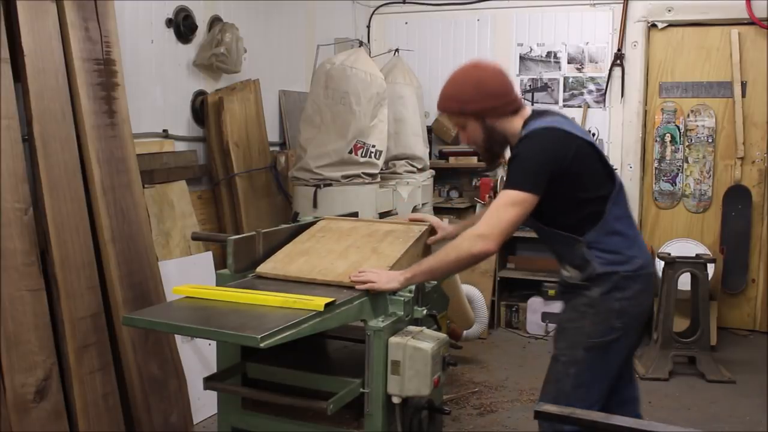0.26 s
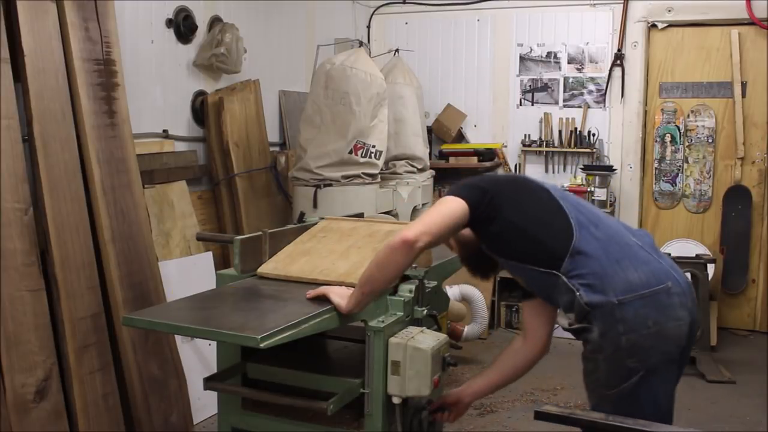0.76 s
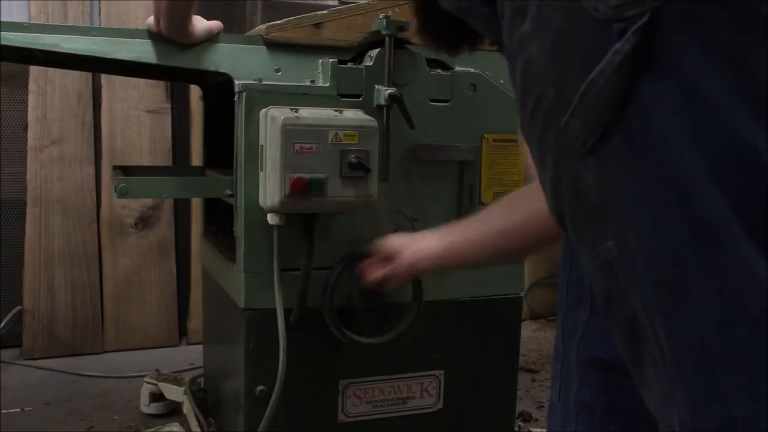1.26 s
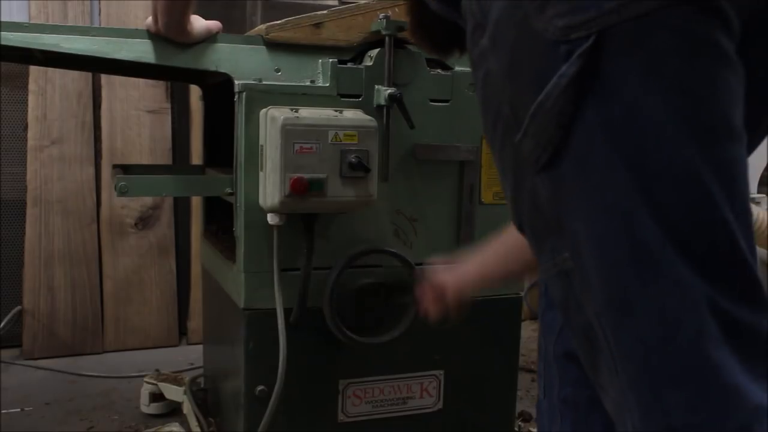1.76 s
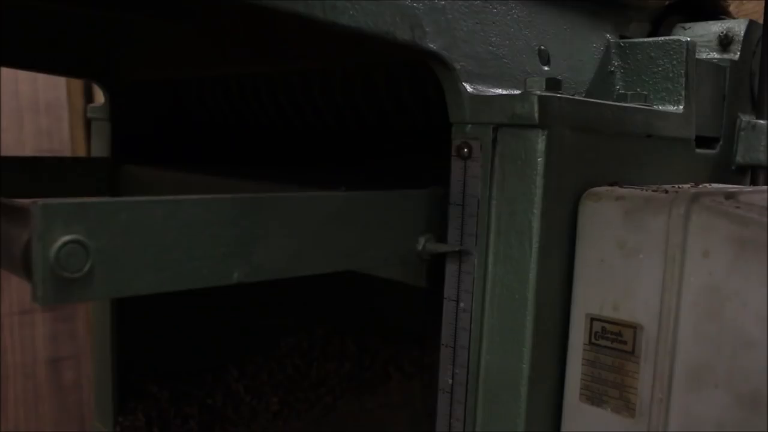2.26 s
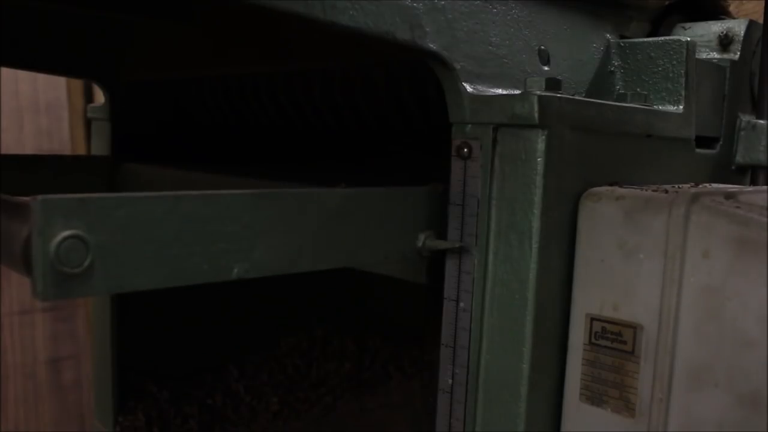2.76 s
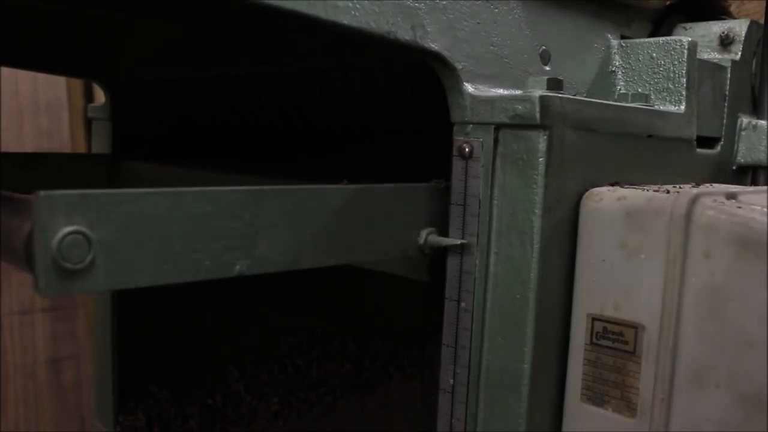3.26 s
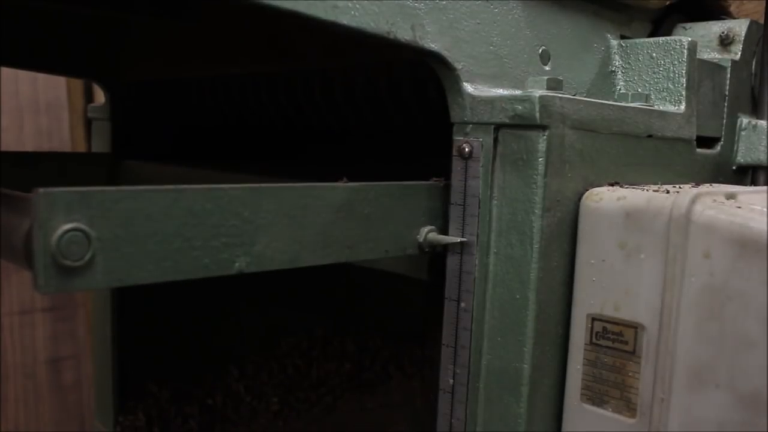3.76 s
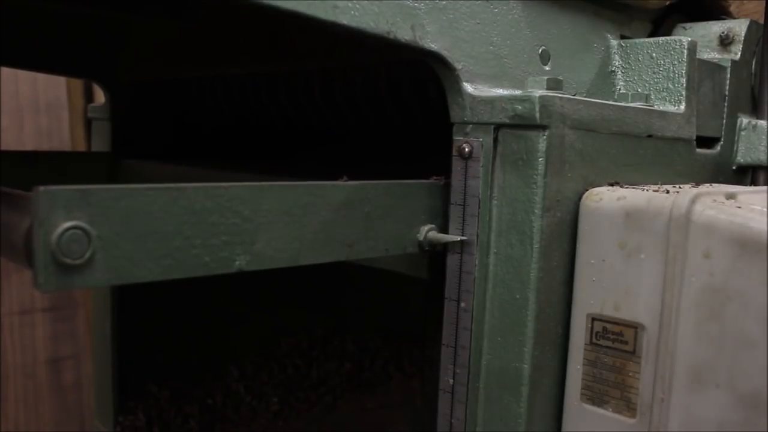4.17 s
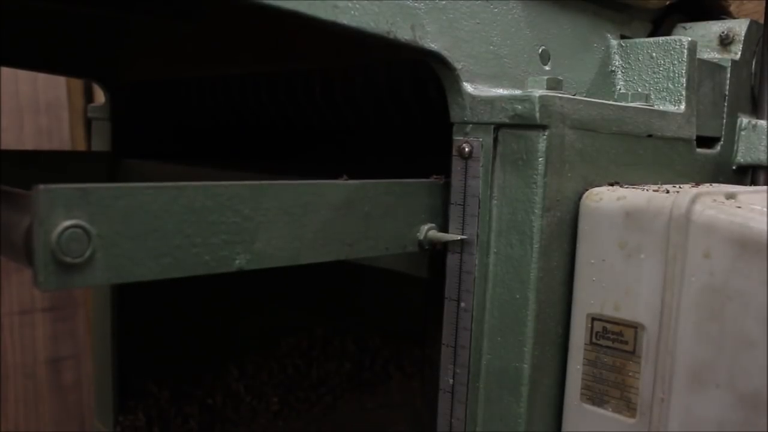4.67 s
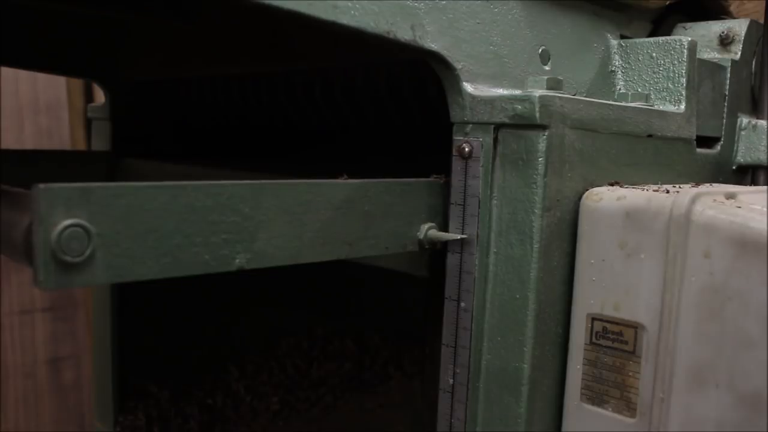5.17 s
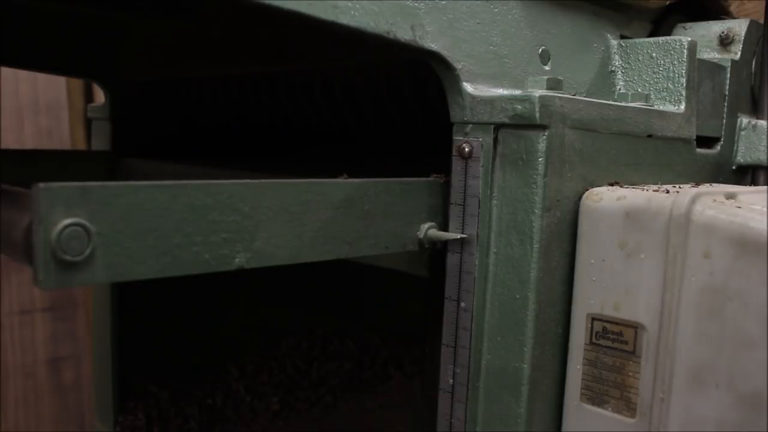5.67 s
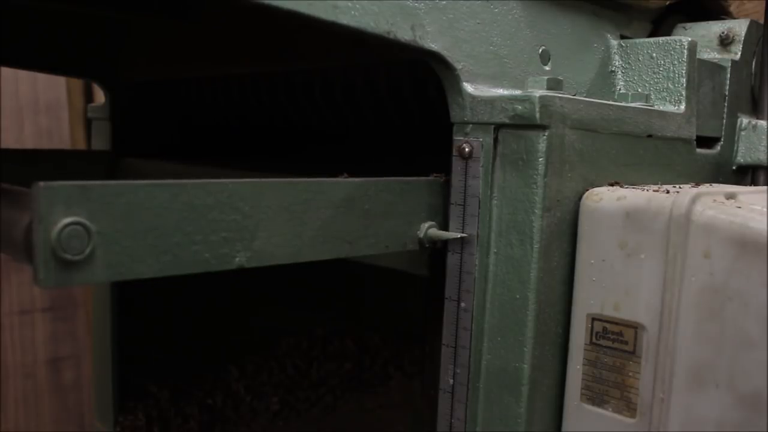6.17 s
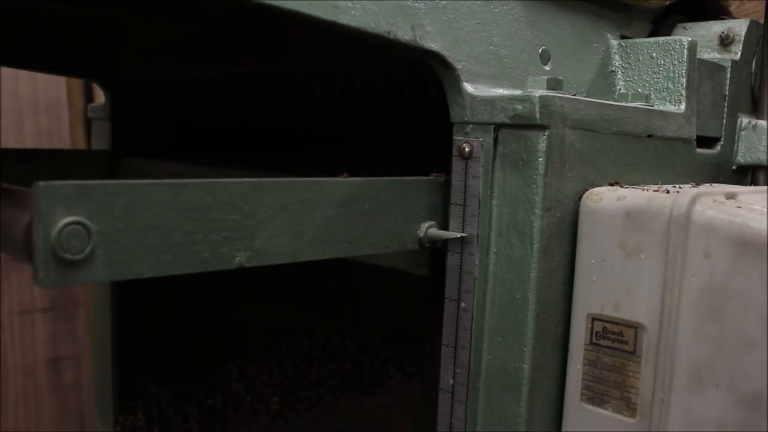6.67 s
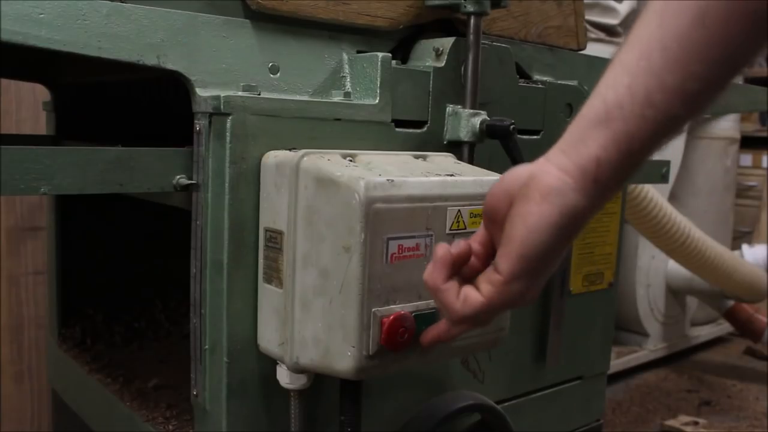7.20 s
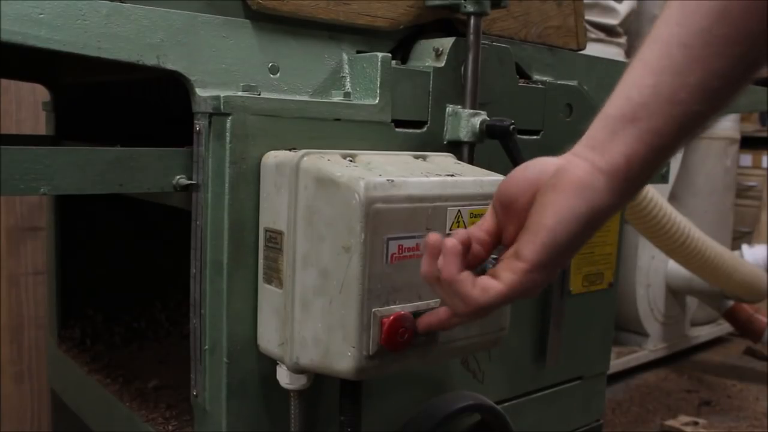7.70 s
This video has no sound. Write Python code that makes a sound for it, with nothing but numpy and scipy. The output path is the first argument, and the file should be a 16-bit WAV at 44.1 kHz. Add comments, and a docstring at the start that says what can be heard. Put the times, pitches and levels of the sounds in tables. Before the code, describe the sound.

Sharp knocks and brief scuffs open the scene in a workshop with a short echo. Then the handwheel of an iron woodworking machine turns, sticking and slipping in thin, piercing squeaks mixed with clanks and creaks. After a quieter stretch of light taps and rubbing, a switch snaps and the motor surges into a growl. Far-off machines drone faintly underneath throughout.

```python
"""A heavy woodworking machine stands idle in an echoing workshop, over the rush of distant machines.
First come knocks of tools and scuffs of hands, cloth and timber. From 1.2 s to 5.3 s a dry handwheel
winds the table: its screw sticks and slips, squealing near 5 kHz, among short creaks and gliding tones.
A few softer knocks and scuffs follow. At 7.5 s the switch clacks and the motor starts with a roar."""
import sys
import numpy as np
from scipy import signal
from scipy.fft import rfft, irfft
from scipy.io import wavfile
from scipy.ndimage import uniform_filter1d

SR = 44100
rng = np.random.default_rng(int(sys.argv[2]) if len(sys.argv) > 2 else 0)


def wav_record(signal):
    """Record a signal, one row per channel, as 16-bit PCM in the file named by sys.argv[1]."""
    frames = np.transpose(np.atleast_2d(signal))
    bounded = np.clip(frames, -1, 1)
    # unit amplitude maps onto the largest positive 16-bit level
    quanta = np.round(bounded * 32767).astype(np.int16)
    wavfile.write(sys.argv[1], SR, quanta)


N = 350154
T = np.arange(N) / SR

# Slips of the screw: peak_s, level_db, rise_s, fall_s, start_pitch_hz, end_pitch_hz
SCREW_SLIPS = [(1.232, -3.5, 0.002, 0.0093, 5370, 5350), (1.272, -23, .008, 0.022, 5200, 5300),
               (1.538, -6, 0.003, 0.026, 5110, 5266), (1.56, -13, 0.018, 0.048, 5243, 5295),
               (2.013, -2.5, 0.0046, 0.01, 6020, 5740), (2.05, -27.5, 0.044, 0.034, 5780, 5720),
               (2.083, -21, 0.017, .02, 5840, 5770), (2.099, -8, .006, 0.011, 5720, 5640),
               (2.107, -12.5, .008, .012, 5590, 5460), (2.129, -18.5, .015, .01, 5540, 5570),
               (2.339, -12, .005, 0.0089, 4930, 5010), (2.36, -30, 0.024, 0.049, 5030, 5030),
               (2.384, -3, 0.0067, 0.015, 4990, 5250), (2.419, -17, 0.031, .03, 5250, 5175),
               (2.468, -19.5, .08, 0.044, 5185, 5090), (2.866, -10, 0.0068, 0.039, 5203, 5290),
               (2.902, -16, .02, 0.037, 5110, 4990), (2.961, -29, 0.06, 0.093, 5094, 4926),
               (3.023, -13, 0.0072, 0.038, 5203, 5220), (3.038, -13, .02, 0.017, 5276, 5260),
               (3.052, -11, 0.0072, 0.034, 5295, 5397), (3.43, -6.5, 0.0053, 0.024, 5230, 5410),
               (3.474, -15.5, .025, .065, 5430, 5280), (3.53, -18.5, .035, .06, 5296, 5140),
               (4.01, -19.5, 0.012, .01, 5020, 4850), (4.033, -12, 0.013, 0.095, 5125, 5060),
               (4.108, -14.5, 0.047, 0.033, 5047, 5070), (4.129, -17.5, 0.035, 0.033, 5030, 5030),
               (4.288, -20.5, .01, .09, 5050, 5060), (4.553, -23.5, 0.0092, 0.082, 5065, 5005),
               (4.595, -26, .06, .05, 5010, 4863), (4.625, -25.5, 0.029, 0.052, 5100, 5120),
               (4.686, -16, 0.088, 0.073, 5160, 5010), (4.73, -16.5, 0.081, 0.058, 5100, 5090),
               (4.77, -19, 0.035, 0.066, 5030, 5040), (4.85, -30, .08, .1, 5020, 4940),
               (5.221, -28, 0.015, 0.063, 5155, 5200)]
# How rough the squeal is as the slips turn uneven: time_s, flutter_share
SQUEAL_ROUGHNESS = [(1.2, .15), (1.6, .12), (2.0, .6), (2.13, .6), (2.33, .08), (4.0, .1), (4.2, .05),
                    (4.28, .4), (4.33, .03), (5.3, .03)]
# Short gliding tones (creaks, a faint squeal near 1.8 s and a squeal's lingering ring near 2.2 s):
# peak_s, level_db, pitch_hz, glide_hz_per_ms, half_length_s, octave_db, echo_db
GLIDING_TONES = [(1.377, -8.5, 2040, -26, .0043, -10.5, -6), (1.832, -20, 5270, .1, 0.0029, -35, -3.5),
                 (1.995, -29.5, 5780, 4, .01, -41, -4), (2.227, -31.5, 5103, 4.2, 0.05, -39, 4),
                 (2.463, -34, 3320, -4, 0.013, -16, -7), (2.479, -7.5, 3253, -17.5, 0.0082, -20.5, -1.5),
                 (2.515, -15, 2284, -32, 0.0068, -12.5, -0.5), (2.532, -21.5, 2070, -7.5, 0.0022, -16, 6.5),
                 (3.123, -16.5, 1828, -1, 0.0029, -4, 0.5), (4.152, -22, 1900, -1, 0.0054, -4.5, 0.5),
                 (4.165, -17, 1894, 1, 0.023, -19, 2.5), (5.857, -47.5, 1900, -1, 0.014, -26, -8),
                 (6.166, -53, 3585, 5.2, .0059, -16.5, 6), (7.497, -22, 3124, .3, 0.0081, -28, -8)]
# Knocks of handle, tools and switch: start_s, peak_db, centre_hz, crack_db, echo_db
KNOCK_HITS = [(0.296, -23, 640, -17, 3), (.527, -19, 2400, -17, 5), (0.538, -9, 2220, -14.5, 6),
              (.554, -13.5, 1400, -21, 2.5), (.833, -0.5, 2250, -9.5, 0.5), (1.059, -26, 2200, -34, 6.5),
              (1.222, -12, 2680, -16, -1.5), (1.32, -9.5, 1760, -30, -3), (1.33, -17.5, 1550, -15, -4),
              (1.432, -11, 1990, -19, -10), (1.528, -13, 1597, -26, -24), (1.601, -0.5, 2240, -24, -3),
              (1.742, -2, 3400, -11, -0.5), (1.775, -7.5, 1670, -26, -1.5), (1.883, -8.5, 1815, -44, -6),
              (2.002, -15.5, 1630, -33, -8), (2.041, -22.5, 1876, -26, 7.5), (2.086, -17, 1820, -28, -19),
              (2.255, -25, 2160, -22, 1), (2.324, -15, 1523, -17.5, -14), (2.843, -22.5, 1590, -22.5, -13),
              (3.122, -21.5, 1840, -17, 0.5), (3.145, -25, 1710, -24.5, -2), (3.427, -28, 4480, -15.5, -17),
              (3.637, -30, 1040, -12.5, 11), (4.408, -40, 1930, -21.5, -12),
              (5.946, -40.5, 2200, -21.5, -7), (6.149, -39, 1990, -21, -3.5),
              (6.388, -45, 2190, -18.5, -13), (6.472, -26, 560, -19, 1.5), (6.492, -18, 2000, -27, -3.5),
              (6.625, -25.5, 1830, -27, -10), (6.645, -25, 1340, -25, 2.5), (6.932, -32.5, 1910, -18.5, 9),
              (7.345, -26, 1150, -20, -10), (7.456, -28, 1250, -20.5, 1.5), (7.517, -11.5, 2500, -5.5, -11),
              (7.532, -15.5, 1010, -26, -14)]
# Notes at which the iron frame rings: pitch_hz, level_db, ring_s (time to fade by 60 dB)
FRAME_NOTES = [(1000, -8, .012), (1770, -8, .012), (2200, -5, .012), (2830, -5, .012), (3400, -6, .01),
               (4450, -6, .01), (5420, -10, .01), (8040, -16, .01)]
# Tone colour of the motor's roar: frequency_hz, level_db
ROAR_SPECTRUM = [(24, -52), (40, -35), (64, -20), (101, -15), (130, -6), (189, -15.5), (243, -10.5),
                 (646, -13.5), (852, -16.5), (3140, -31), (3650, -38.5), (8340, -40.5), (16000, -77)]
# Scuffs of hands, cloth and timber: peak_s, level_db, rise_s, fall_s, treble_db
SCUFF_STROKES = [(0.257, -37.5, 0.0091, 0.074, 2), (0.307, -32.5, 0.057, 0.11, -15),
                 (0.551, -29.5, 0.069, 0.012, -6.5), (0.663, -31, 0.011, 0.059, -18),
                 (0.717, -26.5, 0.076, 0.13, -6.5), (1.451, -33.5, 0.019, 0.029, -9),
                 (1.492, -32, 0.048, 0.055, -28), (2.334, -27, 0.0034, 0.014, -8),
                 (3.402, -37.5, 0.084, 0.022, -33), (3.646, -35, 0.026, 0.083, -38),
                 (3.747, -40, 0.0091, 0.045, -25), (6.86, -56.5, 0.38, 0.15, 0.5),
                 (6.938, -45.5, 0.038, 0.09, -14), (7.074, -61, .03, .05, 3.5)]
# Tone colour of a scuff: frequency_hz, level_db
SCUFF_SPECTRUM = [(47, -34), (80, -11.5), (338, -4), (858, -8.5), (1170, -6), (1600, -7.5), (2040, -8),
                  (3100, -10), (7360, -12.5), (16000, -46)]
# Tone colour of the rush of distant machines: frequency_hz, level_db
RUSH_SPECTRUM = [(35, -38), (60, -12.5), (85, -5), (150, -20), (204, -4.5), (258, -15.5), (304, -5),
                 (393, -2.5), (854, -12), (1080, -8.5), (1770, -12.5), (1900, -14.5), (2240, -18),
                 (15000, -38.5), (16500, -53)]
# How the background changes: time_s, rush_db, treble_db, drone_db
BACKGROUND_LEVELS = [(0, -46, -15.5, -45), (.6, -48, -4, -59), (1.05, -48, -14, -53.5),
                     (1.4, -48, -14, -48.5), (1.85, -41, -17, -49.5), (2.3, -46, -13.5, -47.5),
                     (2.6, -54, -3.5, -60.5), (2.8, -49, -14.5, -52.5), (3.4, -51.5, -7.5, -60),
                     (3.8, -47.5, -9.5, -62.5), (4.35, -54, -11, -61.5), (6.1, -53.5, -11, -63),
                     (6.6, -48, -13.5, -54.5), (7.2, -59, -9, -64.5), (7.45, -51.5, -18, -65.5)]
# Notes of the low drone: pitch_hz, width_hz, level_db
DRONE_NOTES = [(128.7, 18, -1), (258.4, 23, -3)]
# Notes of a faint steady hum: pitch_hz, width_hz, level_db
HUM_NOTES = [(400, 30, -63), (1100, 30, -68)]
# How long the room rings: frequency_hz, ring_s (time to fade by 60 dB)
ROOM_RING_TIMES = [(150, 0.25), (700, 0.59), (2000, 0.67), (5000, 0.66), (10000, 0.11), (16000, 0.18)]
# Stretches of time, each ending with its echo cut short: start_s, end_s
ECHO_STRETCHES = [(0, .559), (.559, 1.221), (1.221, 2.194), (2.226, 7.085), (7.085, 7.94)]


def screw_squeals():
    """Dry threads stick and slip, so the screw rings with a high, almost pure tone."""
    power = np.full(N, 1e-14)
    weight, weighted_hz = np.full(N, 1e-42), np.full(N, 5200e-42)   # rests at 5200 Hz between slips
    for peak_s, level_db, rise_s, fall_s, start_hz, end_hz in SCREW_SLIPS:
        span, t, gain = swell(peak_s, level_db, rise_s, fall_s)
        power[span] += gain ** 2
        weight[span] += gain ** 6   # the strongest slip sets the pitch
        weighted_hz[span] += gain ** 6 * np.interp(t, [-rise_s, fall_s], [start_hz, end_hz])
    pitch_hz = uniform_filter1d(weighted_hz / weight, size=130) * (1 + .003 * drift(25))
    phase = 2 * np.pi * np.cumsum(pitch_hz) / SR
    tone = np.sin(phase) + from_db(-20) * np.sin(2 * phase) + from_db(-38) * np.sin(3 * phase)
    flutter_share, = curves(SQUEAL_ROUGHNESS)
    flutter = 1 + flutter_share * uniform_filter1d(drift(200), size=60)
    loudness = from_db(uniform_filter1d(10 * np.log10(power), size=190))
    return np.sqrt(2) * loudness * tone * flutter


def gliding_tones():
    """Creaks and faint squeals swell briefly as their pitch glides. Returns them and their room feed."""
    direct, to_room = np.zeros(N), np.zeros(N)
    for peak_s, level_db, pitch_hz, glide_hz_per_ms, half_length_s, octave_db, echo_db in GLIDING_TONES:
        span = slice(int((peak_s - .05) * SR), int((peak_s + .05) * SR))
        t = T[span] - peak_s
        phase = 2 * np.pi * (pitch_hz * t + 500 * glide_hz_per_ms * t ** 2)
        tone = sum(from_db(octave_db * (k - 1) ** 1.3) * np.sin(k * phase) for k in range(1, 5))
        glide = from_db(level_db) * np.exp(-2 * (t / half_length_s) ** 2) * tone
        direct[span] += glide
        to_room[span] += from_db(echo_db) * glide
    return direct, to_room


def knocks():
    """Blows ring the iron frame with a bright crack. Returns the sound and what it sends to the room."""
    direct, to_room, t = np.zeros(N), np.zeros(N), T[:2000]
    draws = rng.standard_normal((len(KNOCK_HITS), len(t) + len(FRAME_NOTES)))
    reach = 2 ** .77   # a knock's band reaches .77 octaves above its centre and half that below
    for (start_s, peak_db, centre_hz, crack_db, echo_db), draw in zip(KNOCK_HITS, draws):
        rattle = draw[:len(t)] * t * np.exp(-t / .0022)
        hard_touch = signal.unit_impulse(len(t), idx=40)
        contact = rattle / np.linalg.norm(rattle) + hard_touch
        body = contact
        for (pitch_hz, level_db, ring_s), chance in zip(FRAME_NOTES, draw[len(t):]):
            octaves_away = abs(np.log2(pitch_hz / centre_hz))
            gain = from_db(level_db - 3 + 3 * chance - 4 * octaves_away)
            body = body + gain * resonance(contact, pitch_hz, np.log(1000) / (np.pi * ring_s))
        body = band_pass(body, centre_hz / np.sqrt(reach), centre_hz * reach)
        crack = band_pass(contact, 4000, 9000, order=3)
        knock = rms_one(body) + from_db(crack_db) * rms_one(crack)
        knock = from_db(peak_db) * knock / np.abs(knock).max()
        at = round(start_s * SR)
        direct[at:at + len(t)] += knock
        to_room[at:at + len(t)] += from_db(echo_db) * knock
    return direct, to_room


def motor():
    """Belt and cutter block roar, the spinning rotor shakes the frame, and the housing growls."""
    start_s, first_throb_s, full_speed_s = 7.5, 7.59, 7.86
    throb_hz, fade_db_per_s = 4.63, 16
    t = np.maximum(T - start_s, 0)
    uneven_noise = rng.standard_normal(N) * from_db(1.5 * drift(42))
    low, high = low_and_high(uneven_noise, ROAR_SPECTRUM)
    treble_db = -17 + 13 * np.exp(-(t / .034) ** 2)   # a brief rattle at switch-on
    roar_db = -33.5 + 8 * np.exp(-t / .21)   # surges, then settles
    roar = from_db(roar_db) * (low + from_db(treble_db) * high)
    phase = 2 * np.pi * np.cumsum(122.2 + 3.68 * drift(12.8)) / SR
    throb = (1 + .8 * np.cos(2 * np.pi * throb_hz * (T - first_throb_s))) / 2
    build_up = np.clip(t / (first_throb_s - start_s), 0, 1)
    frame = np.sqrt(2) * from_db(-22 - fade_db_per_s * t) * build_up * throb * np.sin(phase)
    growl_db = -41.5 + 9.5 * np.clip((T - full_speed_s) / .02, 0, 1)
    growl = from_db(growl_db) * noisy_note(pitch_hz=613, width_hz=130)
    fade_in = np.clip(t / .024, 0, 1) ** 2
    return fade_in * (roar + frame + growl)


def scuffs():
    """Hands, cloth and timber slide over uneven grit, making short swells of scratchy noise."""
    noise = rng.standard_normal(N)
    grit_db = 3.7 * np.minimum(rng.exponential(1, N), 5) + 2.6 * drift(60)
    low, high = low_and_high(noise * from_db(grit_db), SCUFF_SPECTRUM)
    out = np.zeros(N)
    for peak_s, level_db, rise_s, fall_s, treble_db in SCUFF_STROKES:
        span, _, gain = swell(peak_s, level_db, rise_s, fall_s)
        out[span] += gain * (low[span] + from_db(treble_db) * high[span])
    return out


def distant_machines():
    """Far-off machines rush, drone and hum over the deep rumble of the building."""
    rush_db, treble_db, drone_db = curves(BACKGROUND_LEVELS)
    low, high = low_and_high(rng.standard_normal(N), RUSH_SPECTRUM)
    rumble = from_db(-63.5) * noisy_note(pitch_hz=26, width_hz=16)
    drone = sum(from_db(db) * noisy_note(hz, width_hz) for hz, width_hz, db in DRONE_NOTES)
    hum = sum(from_db(db) * noisy_note(hz, width_hz) for hz, width_hz, db in HUM_NOTES)
    rush = from_db(rush_db + .8 * drift(4.5)) * (low + from_db(treble_db) * high)
    return rush + from_db(drone_db) * drone + rumble + hum


def room_echoes(sound):
    """Echoes blur into a tail of noise in which each band of pitches dies at its own speed."""
    t, tail = T[:SR], np.zeros(SR)
    edges_hz = 60 * 2 ** np.arange(0, 8.6, .5)
    noise = rng.standard_normal((2, SR))
    for k, (low_hz, high_hz) in enumerate(zip(edges_hz, edges_hz[1:])):
        ring_s = at_hz(ROOM_RING_TIMES, np.sqrt(low_hz * high_hz))
        tail += band_pass(noise[k % 2], low_hz, high_hz) * from_db(-60 * t / ring_s)
    tail *= np.clip((t - .001) / .012, 0, 1)   # echoes start building after 1 ms
    tail *= from_db(-7) / np.linalg.norm(tail)
    out = np.zeros(N)
    for start_s, end_s in ECHO_STRETCHES:
        span = slice(round(start_s * SR), round(end_s * SR))
        out[span] = signal.fftconvolve(sound[span], tail)[:len(sound[span])]
    return out


def from_db(db):
    """Turns decibels into a gain to multiply by."""
    return 10 ** (np.asarray(db) / 20)


def rms_one(x):
    """Scales a signal so its average strength (rms) is 1."""
    return x / np.sqrt(np.mean(x ** 2) + 1e-20)


def curves(rows):
    """Joins a table's timed points with straight lines, one curve for each value column."""
    times_s, *columns = np.transpose(rows)
    return [np.interp(T, times_s, column) for column in columns]


def at_hz(rows, hz):
    """Looks up a table by frequency, with octaves evenly spaced."""
    table_hz, values = np.transpose(rows)
    return np.interp(np.log(hz), np.log(table_hz), values)


def drift(rate_hz):
    """A smooth random wobble, about 1 in size."""
    r = np.exp(-2 * np.pi * rate_hz / SR)
    return rms_one(signal.lfilter([1], [1, -2 * r, r * r], rng.standard_normal(N + SR))[SR:])


def swell(peak_s, level_db, rise_s, fall_s):
    """Climbs 25 dB per rise_s, drops 25 dB per fall_s. Returns span, time from the peak and gain."""
    span = slice(int((peak_s - 3 * rise_s) * SR), int((peak_s + 3 * fall_s) * SR))
    t = T[span] - peak_s
    return span, t, from_db(level_db - 25 * np.maximum(-t / rise_s, t / fall_s))


def low_and_high(noise, spectrum):
    """Colours noise and splits it at 3.5 kHz into two parts of equal strength."""
    hz = np.fft.rfftfreq(N, 1 / SR) + 1
    shaped = rfft(noise) * from_db(at_hz(spectrum, hz))
    high_share = 1 / (1 + (3500 / hz) ** 4)
    return rms_one(irfft(shaped * (1 - high_share), N)), rms_one(irfft(shaped * high_share, N))


def band_pass(x, low_hz, high_hz, order=2):
    """Keeps the sound between two frequencies."""
    return signal.sosfilt(signal.butter(order, [low_hz, high_hz], "band", fs=SR, output="sos"), x)


def resonance(x, pitch_hz, width_hz):
    """Rings at one pitch; a narrower width rings longer."""
    r = np.exp(-np.pi * width_hz / SR)
    feedback = [1, -2 * r * np.cos(2 * np.pi * pitch_hz / SR), r * r]
    return signal.lfilter(np.array([1, 0, -1]) * (1 - r * r) / 2, feedback, x + 1e-18)


def noisy_note(pitch_hz, width_hz):
    """A wavering note made from a narrow band of noise."""
    return rms_one(resonance(rng.standard_normal(N), pitch_hz, width_hz))


def scene():
    """Adds up the sources and their echoes, the same on left and right."""
    knock, knock_to_room = knocks()
    glide, glide_to_room = gliding_tones()
    squeal, scuff = screw_squeals(), scuffs()
    # One sliding contact carries both motions, so their pitches add and subtract into extra tones.
    extra_tones = from_db(13) * glide * squeal
    echoes = room_echoes(from_db(-1) * (squeal + extra_tones) + glide_to_room + knock_to_room + scuff)
    mono = squeal + extra_tones + glide + knock + scuff + echoes + distant_machines() + motor()
    # The level dips briefly near 2.2 s, in the gap between two stretches.
    in_stretch = sum((T >= start_s) & (T < end_s) for start_s, end_s in ECHO_STRETCHES)
    return np.tile(mono * np.maximum(in_stretch, from_db(-34)), (2, 1))


def record(dry):
    """A gain control turns loud moments down; peaks are rounded, hiss is added, the top treble is cut."""
    threshold_db, cut_share, recover_db_per_s, ceiling = -21, .19, 59, .55
    level_db = 10 * np.log10(uniform_filter1d(dry[0] ** 2, size=200) + 1e-12)
    held_db = np.maximum.accumulate(level_db + recover_db_per_s * T) - recover_db_per_s * T
    cut_db = uniform_filter1d(cut_share * np.maximum(held_db - threshold_db, 0), size=100)
    rounded = ceiling * np.tanh(dry * from_db(-cut_db) / ceiling)
    hiss = from_db(-69.5) * rng.standard_normal(N) * [[1], [-1]]   # opposite on left and right
    low_pass = signal.cheby2(14, 70, 16800, fs=SR, output="sos")
    return signal.sosfilt(low_pass, rounded + hiss)


dry = scene()
out = record(dry)
wav_record(out)
```